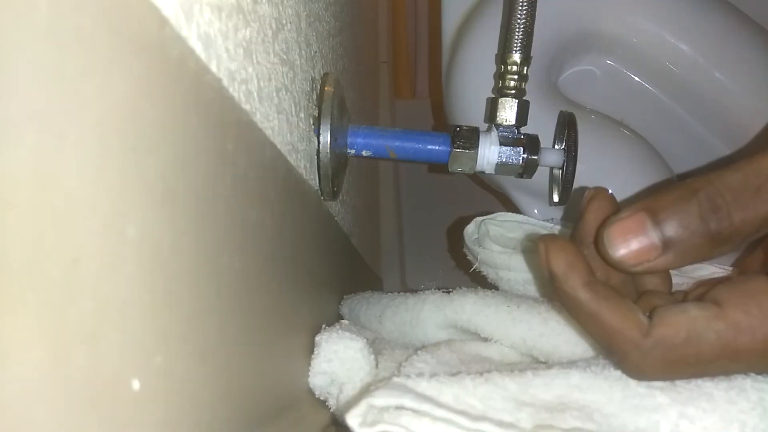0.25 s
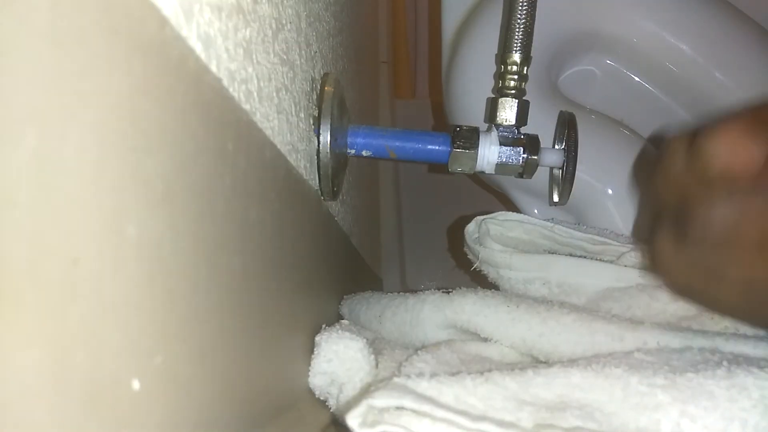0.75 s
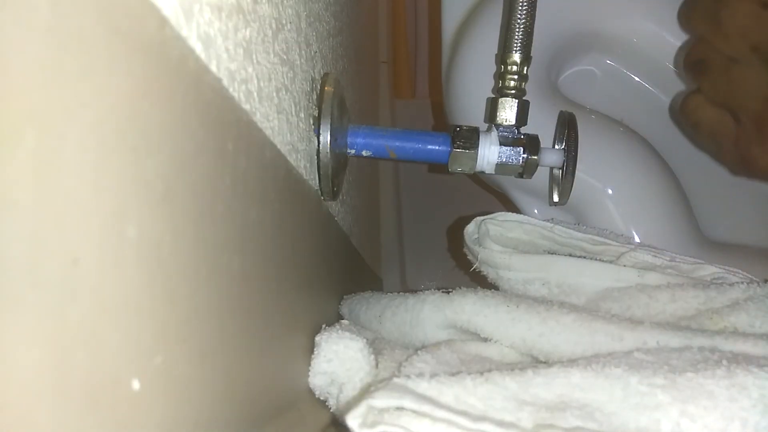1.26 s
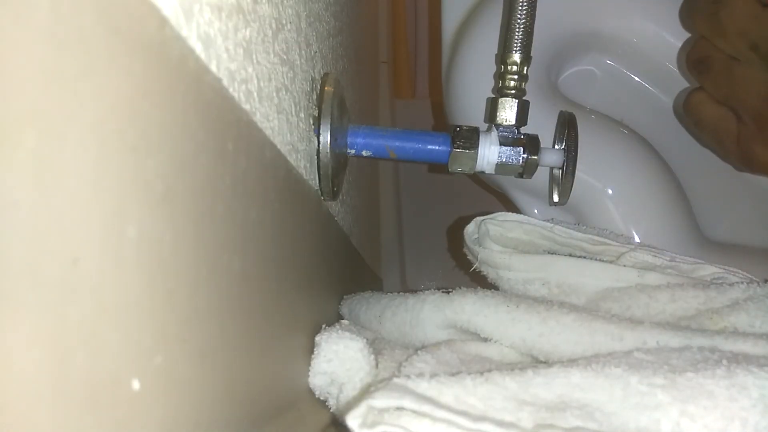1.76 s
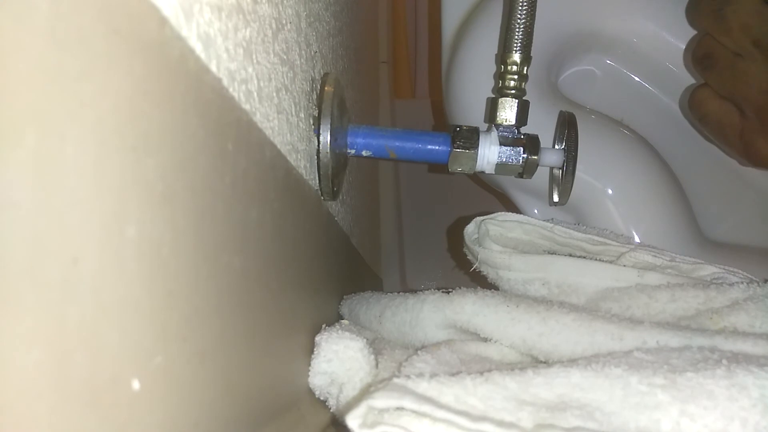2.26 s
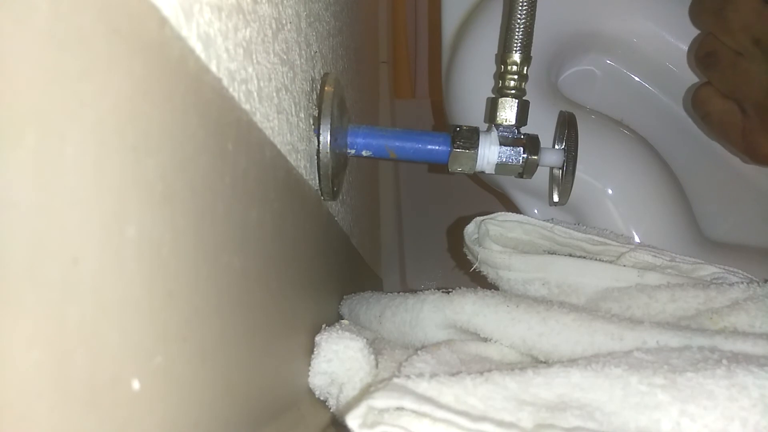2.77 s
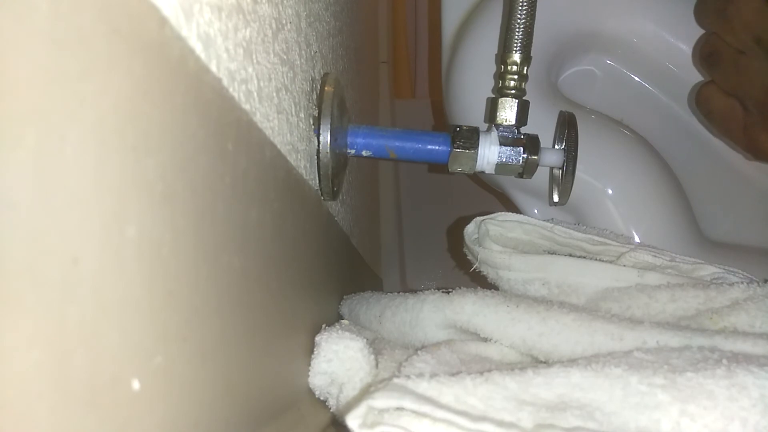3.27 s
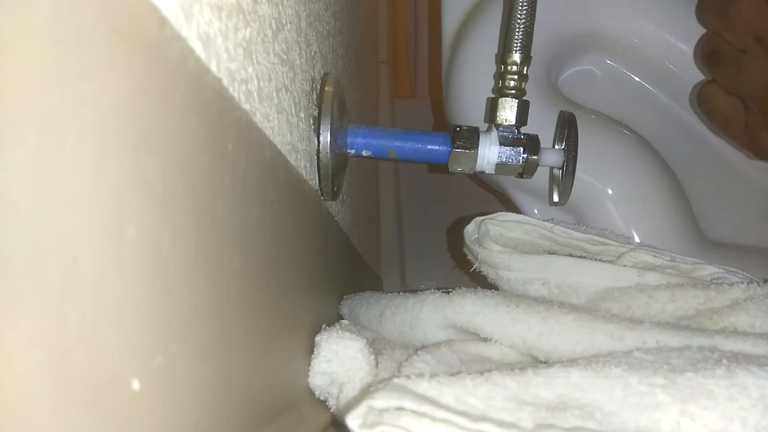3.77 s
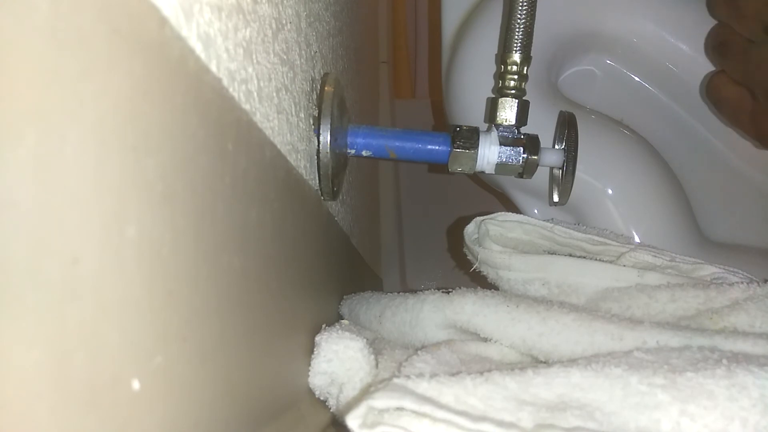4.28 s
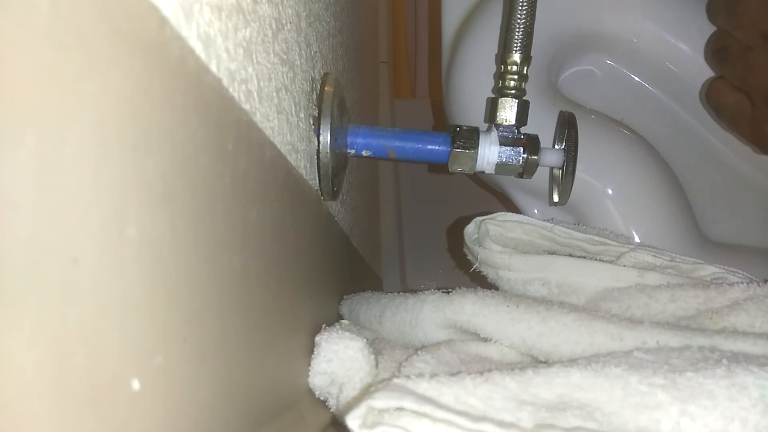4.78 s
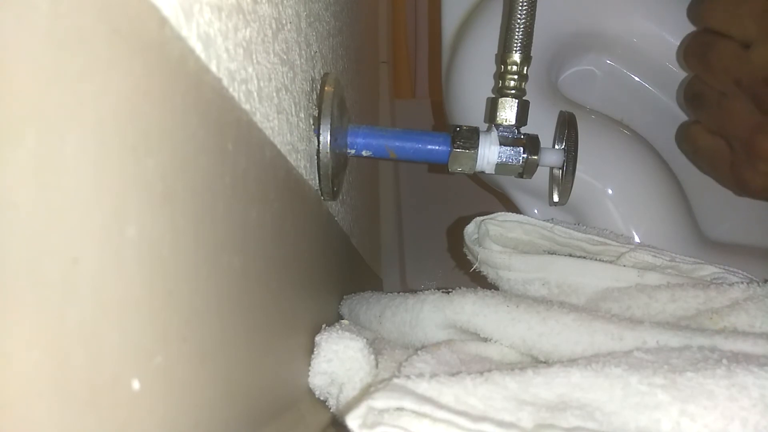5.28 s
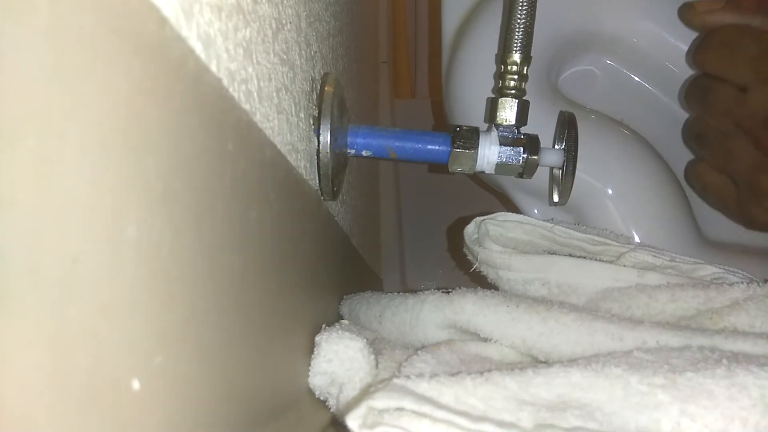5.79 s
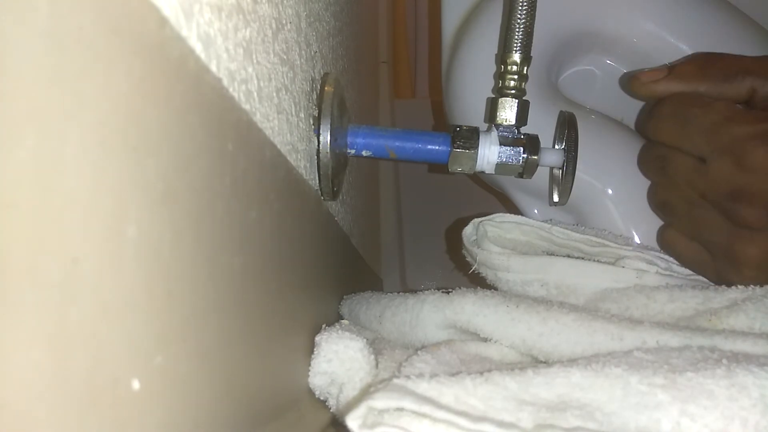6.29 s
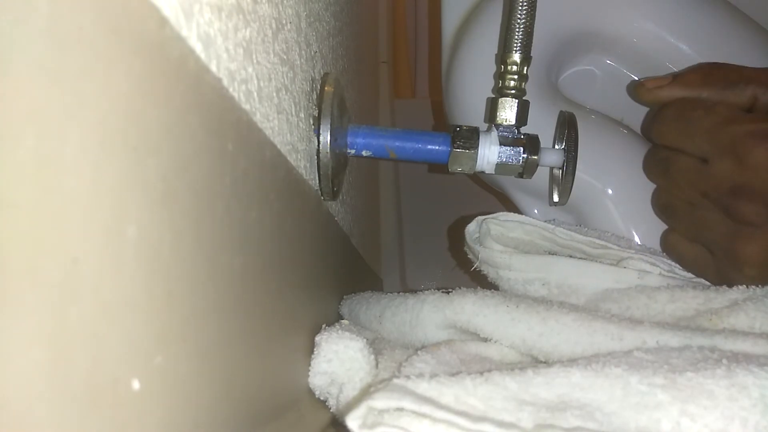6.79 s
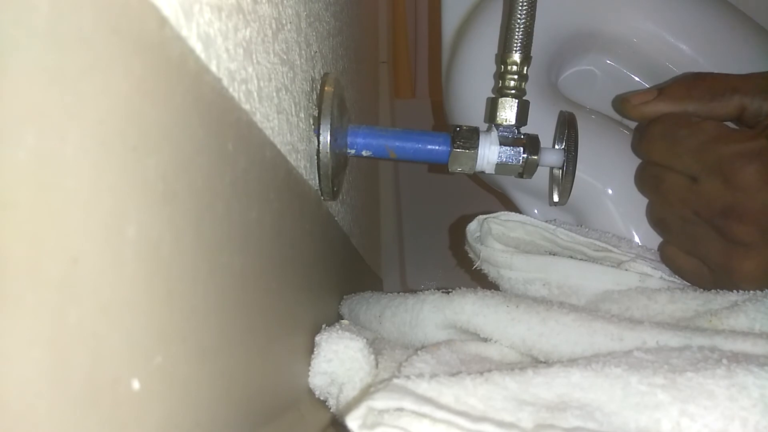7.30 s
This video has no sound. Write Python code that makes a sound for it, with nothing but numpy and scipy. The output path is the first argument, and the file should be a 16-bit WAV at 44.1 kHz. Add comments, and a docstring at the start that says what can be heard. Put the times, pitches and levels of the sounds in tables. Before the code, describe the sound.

A close stereo sound in a small hard bathroom. For a few hundredths of a second there is only soft low plumbing rumble, with a tick and low bump on the left. At about 0.07 s water bursts on abruptly, loudest until 0.3 s, with a tubular ring from the fill pipe. A strong, very high sputtering hiss with faint whistling stays close on the left, above a metallic pipe ring; the right is darker. Water splashes and fizzes in the tank. Hollow gulps come around 0.3 and 1 s, with a prominent cluster and dull plunge at 1.9-2.2 s, then more at 2.6 s. The hiss dips and spurts at 3.2, 4.6 and 5.1 s. Another gulp falls at 5.4 s, and heavier thuds at 6.6 s, bubbling around 7 s. The hiss has weakened, but water still runs at the end, about 7.5 s.

```python
"""A small bathroom: a toilet tank refills, heard from beside the shut-off valve, after a tick and a low bump.
Cavitation in the valve seat gives a sputtering hiss, close to the left microphone; resonance rings the supply pipe.
In the tank the stream splashes as a crowd of ringing bubbles, gulps as big bubbles, and plunges with dull thuds.
The air under the lid resonates as a soft boom, over the shaped-noise rumble of the plumbing.
"""
import sys
import numpy as np
from scipy import signal
from scipy.fft import rfft, irfft, next_fast_len
from scipy.io import wavfile
from scipy.ndimage import uniform_filter1d, map_coordinates

SR = 44100
rng = np.random.default_rng(int(sys.argv[2]) if len(sys.argv) > 2 else 0)


def store_wav(level_fs):
    """Save 16-bit WAV to argv[1]."""
    pcm = np.round(np.clip(np.atleast_2d(level_fs), -1, 1) * 32767)
    wavfile.write(sys.argv[1], SR, pcm.T.astype(np.int16))


N = 332592

# Mode widths are half-widths at -6 dB; spectra and modes give relative levels, later scaled to rms 1.
# Plumbing rumble spectrum: frequency_hz, density_db (per Hz)
RUMBLE_SPECTRUM = [(20, -26), (40, -6), (60, 0), (100, -1.5), (170, -3), (300, -14.5), (1000, -35.5)]
# Steady low layers: time_s, boom_db (before a 1 dB cut), rumble_db
LOW_LEVELS = [(0, -46, -44), (.7, -48, -50.5), (1.05, -48, -45.5), (1.3, -52, -54), (1.55, -49, -47),
              (1.75, -46, -51.5), (2.7, -45.5, -48.5), (3.1, -42, -57), (3.9, -47, -55.5), (4.4, -43, -48),
              (5.3, -42, -51.5), (6.1, -43.5, -54), (6.7, -42.5, -46), (7.54, -42.5, -55.5)]
STILL_DB = -4  # change of the rumble before the water runs
# Modes of the booming air space: centre_hz, width_hz, level_db
BOOM_MODES = [(202, 12, 0), (226, 10, -16), (175, 12, -17)]
# Modes of the glugging air space: centre_hz, width_hz, level_db
GLUG_MODES = [(314, 18, -6), (362.6, 10, 6), (404.7, 27.5, 1)]
GLUG_START_DB, GLUG_GROWTH_DB_PER_S = -56.5, 1.2  # steady churning, stronger as the tank fills
# Heaving of the water in the tank: crest_s, glug_db, boom_db
SLOSHES = [(.11, -46, -30.5), (.22, -49, -36.5), (.46, -48, -37.5), (.58, -44, -39), (.71, -48, -54),
           (1.0, -44, -33), (1.14, -46, -44), (1.44, -46, -34), (1.98, -40.5, -37), (2.36, -69, -37.5),
           (2.96, -66, -42), (3.22, -50, -40), (4.02, -53, -39), (4.77, -41, -38), (5.04, -53, -34.5),
           (5.55, -40.5, -41), (6.67, -45, -37.5), (6.79, -55, -39.5), (7.33, -66, -32)]
SLOSH_RISE_S, SLOSH_FALL_S = 0.048, 0.074  # Gaussian scales before and after the crest
SLOSH_SPLASH_DB, SLOSH_RUMBLE_DB = -13, -17  # against the slosh's glug
# Air dragged under by the stream: start_s, pitch_hz, level_db
PLUNGES = [(0.965, 310, -34), (1.048, 309, -32), (1.145, 336, -38), (1.443, 410, -36), (1.916, 358, -30.5),
           (3.284, 392, -32), (4.734, 361, -32.5), (6.125, 365, -34.5), (6.602, 356, -28),
           (6.674, 363, -31.5), (7.443, 410, -36)]
# Water closing over a plunge: frequency_hz, density_db (per Hz)
THUD_SPECTRUM = [(30, -15), (70, -7), (250, 0), (600, -6), (1500, -34), (4000, -70)]
# Big bubbles: start_s, pitch_hz, level_db (before a 1.5 dB lift of the bubble itself)
GULPS = [(0.282, 820, -22), (0.352, 813, -31), (0.51, 794, -30.5), (0.975, 580, -30), (0.99, 900, -26.5),
         (1.017, 800, -31), (1.57, 865, -34), (1.575, 1335, -28), (1.946, 883, -14.5), (1.955, 690, -26),
         (1.984, 888, -21), (1.99, 1170, -31), (2.055, 910, -30), (2.105, 612, -24), (2.139, 1310, -33),
         (2.233, 519, -32.5), (2.528, 597, -33), (2.62, 784, -26), (2.625, 680, -32), (2.635, 890, -33),
         (2.649, 752, -36), (2.65, 1330, -32), (2.902, 1205, -32.5), (4.169, 870, -29.5),
         (4.274, 870, -32.5), (4.37, 874, -34.5), (4.56, 648, -36), (4.59, 874, -35.5), (5.04, 564, -35.5),
         (5.384, 903, -24), (6.6, 605, -33), (6.61, 896, -40), (6.66, 770, -42), (6.882, 936, -34),
         (6.908, 886, -32.5), (6.94, 1170, -41), (6.97, 950, -43), (7.058, 770, -25.5), (7.07, 897, -30.5),
         (7.105, 760, -29.5), (7.145, 698, -35), (7.2, 780, -39), (7.29, 544, -40), (7.31, 1180, -44),
         (7.325, 646, -41), (7.362, 880, -29.5)]
# Modes of the basin, rung by the splash: centre_hz, width_hz, level_db
BASIN_MODES = [(520, 25, -7), (625, 40, -2), (705, 18, -1), (775, 16, -2), (815, 14, -1), (868, 16, 2),
               (896, 14, 7), (1020, 50, -7), (1170, 30, -2), (1300, 35, -5), (1445, 18, 0)]
BASIN_RING_DB, BASIN_T60_S = -16, 0.31  # ring of the basin under a gulp, against level_db; its decay
# Splash spectrum: frequency_hz, density_db (per Hz)
SPLASH_SPECTRUM = [(160, -18.5), (280, -6.5), (356, -8), (448, -15), (570, -9.5), (860, -7.5), (980, -7),
                   (1410, 2), (1610, -0.5), (1790, -3), (2340, -2), (2910, -3.5), (4800, 0.5), (5400, 5),
                   (6500, -29), (11000, -120)]
# Modes of the fill tube: centre_hz, width_hz, level_db
TUBE_MODES = [(1770.4, 15.7, 22), (1856, 36, 15), (1936, 20, 15.5), (2020, 20, 5.5), (1770, 134, 7)]
# Level of the fill tube's ring: time_s, level_db
TUBE_LEVEL = [(.08, -27), (.24, -27.5), (.39, -41.5), (.48, -31.5), (.6, -34.5), (.72, -40.5), (.8, -35),
              (.94, -52), (.99, -35), (1.26, -45), (2.0, -41), (2.3, -45.5), (3.65, -46), (4.15, -50.5),
              (4.45, -44), (4.83, -48.5), (5.0, -54), (5.11, -44.5), (5.45, -57), (6.55, -49.5),
              (6.69, -47.5), (6.85, -51.5), (7.1, -51.5), (7.54, -57.5)]
GURGLE_LOWEST_HZ, GURGLE_OCTAVES, GURGLE_DB = 519.5, 1.5, -8.5  # small bubbles: pitch range, mix level
DULL_HZ, DULL_DB_PER_S = 940, 0.02  # the splash slowly loses its treble as the water deepens
# Jet strength in the valve, before spurts: time_s, flow_db (against full flow)
FLOW = [(.1, -3), (.25, -2.2), (.33, -4.5), (.45, -2), (.68, -4), (.78, -0.2), (.94, -4), (1.02, -1),
        (1.2, 0), (1.47, -5), (1.62, 0.5), (1.87, -4.5), (1.97, -3.5), (2.2, -2.5), (2.33, -0.9),
        (2.5, -4.5), (2.67, -4), (2.82, -2), (3.04, -2.5), (3.17, -8.5), (3.72, -5), (3.96, -1.3),
        (4.15, -3.5), (4.4, -8.5), (4.78, -6), (4.95, -14), (4.99, -7), (5.055, -13), (5.07, -5),
        (5.25, -7.5), (5.4, -12), (5.55, -9.5), (6.0, -11), (6.28, -9), (6.42, -14), (6.53, -10),
        (6.68, -8.5), (6.85, -13), (6.95, -11.5), (7.5, -14)]
# Spurts of the jet: start_s, rise_s, fall_s, gain_db
SPURTS = [(3.18, 0.05, 0.089, 8), (3.3, 0.071, 0.25, 6), (4.51, 0.066, 0.14, 7.5), (4.73, 0.069, 0.13, 4.5),
          (5.058, 0.083, 0.091, 11.5), (6.09, 0.068, 0.07, 5.5)]
# Water levels apart from the jet's swings: time_s, pipe_db, splash_db
BODY = [(.3, -31, -42.5), (1.3, -34, -41), (2.1, -32, -42.5), (3.5, -33, -44.5), (4.7, -35, -43.5),
        (5.3, -38, -47.5), (6.2, -37.5, -47.5), (7.54, -39.5, -45.5)]
PIPE_FOLLOWS, SPLASH_FOLLOWS = 0.56, 0.15  # dB for each dB of flow
RUSH_END_S, RUSH_RELEASE_S = 0.25, 0.059  # the first rush through the empty pipe, and its 1/e ebb
RUSH_PIPE_DB, RUSH_SPLASH_DB = 5, 8  # what the rush adds
# Air pockets rattling through the pipe: middle_s, pipe_db
POCKETS = [(1.0, -32), (1.99, -32.5)]
POCKET_S, POCKET_SPLASH_DB = 0.062, -11  # Gaussian scale; splash against pipe ring
# Cavitation hiss spectrum: frequency_hz, density_db (per Hz)
HISS_SPECTRUM = [(3820, -83), (6400, -21.5), (6990, -13.5), (7500, -14), (8370, -15), (11200, 0.5),
                 (12500, -0.5), (13700, -12), (15000, -12.5), (15600, -16.5)]
HISS_DB = -18  # at full flow
# Whistles of the valve seat: centre_hz, width_hz, level_db
WHISTLE_MODES = [(10277, 9, 0), (10752, 11, 1), (10987, 14, -2), (11222, 40, -6), (11454, 14, 0),
                 (12248, 18, -3), (12919, 40, -6), (13732, 18, -14), (13943, 16, -14), (14690, 14, -10),
                 (15251, 16, -13)]
# Settling of the jet: time_s, sizzle_db (finest fizz), spill_db (to the right microphone)
AIM = [(.08, 10.5, 1), (.7, 6.5, 2.5), (1.3, 6, -0.5), (2.1, 4, 0.5), (2.9, 4, -1.5), (3.3, 5.5, -4),
       (4.1, 5.5, -4), (4.6, 6, -1), (5.5, 4, -4.5), (6.2, 3.5, -7), (6.5, 7, -1), (7.54, 5.5, -3.5)]
# Modes of the supply pipe and valve body: centre_hz, width_hz, level_db
PIPE_MODES = [(2490, 50, -23), (2945, 30, -13.5), (3380, 60, -18), (3640, 50, -14), (3780, 55, -13),
              (3930, 35, -15), (4210, 75, -15), (4600, 50, -12), (4780, 30, -16), (5120, 45, -8),
              (5305, 45, 1), (5450, 70, -1), (5680, 110, -3.5), (6030, 120, -4.5), (6480, 110, -10),
              (6720, 110, -11), (7330, 70, -3), (7487, 20, 3), (7666, 19, 3), (7790, 60, -4)]
# Acoustic shadow on the right microphone: frequency_hz, gain_db (against the left)
SHADOW = [(100, -1), (350, -5), (1050, 1.5), (1800, -4.5), (3000, -0.5), (5500, -12.5), (7700, -10.5),
          (8400, -12), (9200, -2.5), (10500, -20), (11300, -21.5), (12100, -37), (13000, -39),
          (15300, -7.5)]
# Likeness of the two microphones: frequency_hz, correlation (from -1 to 1)
CORRELATION = [(60, -0.88), (200, -0.91), (400, -0.8), (700, -0.42), (1800, -0.36), (3000, -0.12)]
BUMP_S, OPEN_S = 0.044, 0.069  # start of the bump, start of the water
TOP_HZ = 15750  # band limit


def amp(db):
    """Level law: decibels to amplitude gain."""
    return 10 ** (np.asarray(db) / 20)


def unit(x):
    """Normalisation to rms 1."""
    return x / np.sqrt(np.mean(x ** 2) + 1e-20)


def seconds():
    """Sampling: the time of every sample."""
    return np.arange(N) / SR


def along(points, hz):
    """Linear interpolation of (Hz, value) points on a log-frequency axis."""
    f, v = np.transpose(points)
    return np.interp(np.log(hz + 1), np.log(f + 1), v)


def curves(rows):
    """Linear interpolation in time: one curve for each column after the time."""
    s, *columns = np.transpose(rows)
    return [np.interp(seconds(), s, column) for column in columns]


def wobble(rate):
    """Slow random modulation: a smooth curve through rate random knots a second."""
    knots = rng.standard_normal(int(N * rate / SR) + 4)
    return map_coordinates(knots, [np.arange(N) * rate / SR])


def noise():
    """White noise: two unrelated channels."""
    return rng.standard_normal((2, N))


def filtered(x, response):
    """Linear filtering: the spectrum times a response of frequency."""
    size = next_fast_len(N + SR // 2)
    return irfft(rfft(x, size) * response(np.fft.rfftfreq(size, 1 / SR)), size)[..., :N]


def coloured(x, spectrum):
    """Spectral shaping by (Hz, dB) points, at rms 1."""
    return unit(filtered(x, lambda hz: amp(along(spectrum, hz))))


def resonant(x, modes):
    """Modal resonance: the powers of steep-skirted modes add, at rms 1."""
    def response(hz):
        power = 0
        for centre, width, db in modes:
            power = power + amp(db) ** 2 / (1 + ((hz - centre) / width) ** 2) ** 2
        return np.sqrt(power)
    return unit(filtered(x, response))


def steadied(x, share):
    """Envelope compression: a share of a narrow ring's random fading is evened out."""
    envelope = abs(signal.hilbert(x, next_fast_len(N))[..., :N])
    return unit(x / (envelope + 0.11) ** np.clip(share, 0, 1))


def restless(x, patchy_db, size, count):
    """Turbulent intermittency: random gain patches, size bins wide and count frames long."""
    z = signal.stft(x, nperseg=1024)[2]
    field = uniform_filter1d(rng.standard_normal(z.shape[1:]), size, 0)
    field = uniform_filter1d(field, count, 1)
    return unit(signal.istft(z * amp(patchy_db * unit(field)), nperseg=1024)[1][:, :N])


def decays(starts, db, t60):
    """Exponential decay: a gain that jumps at each start and loses 60 dB in t60 seconds."""
    kicks = np.bincount((starts * SR).astype(int), amp(db), N)[:N]
    return signal.lfilter([1], [1, -amp(-60 / (t60 * SR))], kicks)


def echoes(x, t60, wet_db):
    """Reverberation at two places: the direct sound and a dense dying tail."""
    t = np.arange(int(SR * t60) + 2) / SR
    tail = rng.standard_normal((2, len(t))) * amp(-60 * t / t60)
    tail *= amp(wet_db) / np.linalg.norm(tail, axis=1, keepdims=True)
    tail[:, 0] += 1
    return signal.fftconvolve(np.atleast_2d(x), tail, axes=1)[:, :N] / np.hypot(1, amp(wet_db))


def alcove(pair, t60, wet_db):
    """Comb filtering: quick echoes between wall and porcelain carve narrow bands, at rms 1."""
    return unit(echoes(pair, t60, wet_db))


def bubbles(starts, hz, gains, cycles, rise, size=3675):
    """Bubble resonance: damped sines with a soft start, climbing in pitch as the bubble nears the surface."""
    t = np.arange(size) / SR
    age = hz[:, None] * t / cycles  # in 1/e decay times
    climb = 1 + rise * np.minimum(age, 2) / 2
    envelope = np.exp(-age) * (1 - np.exp(-5 * age))
    ring = np.sin(2 * np.pi * cycles * age * climb) * envelope
    where = (starts * SR).astype(int)[:, None] + np.arange(size)
    return np.bincount(where.ravel(), (gains[:, None] * ring).ravel(), N)[:N]


def shaded(x):
    """Acoustic shadow: what reaches the right microphone."""
    return filtered(x, lambda hz: amp(along(SHADOW, hz)))


def microphones(pair):
    """Interchannel correlation: opposed in the bass, nearly unrelated in the treble, the right shaded."""
    def mid_side_gains(hz):
        turn = np.arccos(np.clip(along(CORRELATION, hz), -1, 1)) / 2
        return np.array([np.sin(turn), np.cos(turn)])
    side, mid = filtered(pair, mid_side_gains)
    return np.array([mid + side, shaded(mid - side)])


def flow():
    """Varying jet strength in dB: a wandering fall with triangular spurts."""
    flow_db = curves(FLOW)[0]
    for start, rise, fall, db in SPURTS:
        flow_db = flow_db + np.interp(seconds(), [start, start + rise, start + rise + fall], [0, db, 0])
    return flow_db


def first_rush():
    """Transient flow: 1 while water shoots through the empty pipe, then an exponential ebb."""
    return np.exp(-np.maximum(seconds() - RUSH_END_S, 0) / RUSH_RELEASE_S)


def sloshing():
    """Surface heaving as gains of glug and boom: each slosh swells quickly and sinks more slowly."""
    t = seconds()
    gains = 0
    for crest, glug_db, boom_db in SLOSHES:
        scale = np.where(t < crest, SLOSH_RISE_S, SLOSH_FALL_S)
        gains = gains + amp([[glug_db], [boom_db]]) * np.exp(-((t - crest) / scale) ** 2)
    return gains


def pockets():
    """Two-phase flow: the gain of air pockets passing through the pipe."""
    return sum(amp(db) * np.exp(-((seconds() - s) / POCKET_S) ** 2) for s, db in POCKETS)


def rumble(opened):
    """Broadband low noise of the plumbing: softer before the water runs, swelling with each slosh."""
    steady = amp(curves(LOW_LEVELS)[1] + 4.1 * wobble(16))
    gain = np.hypot(steady, amp(SLOSH_RUMBLE_DB) * sloshing()[0])
    return amp(STILL_DB * (1 - opened)) * gain * microphones(coloured(noise(), RUMBLE_SPECTRUM))


def bump(hz=75, swing_db=-31, swing_t60=0.3, tick_db=-28, tick_t60=0.042):
    """Damped impulse response: a tick and a short low swing, mostly on the left, just before the water."""
    t = np.maximum(seconds() - BUMP_S, 0)
    swing = -np.sin(2 * np.pi * hz * t) * amp(swing_db - 60 * t / swing_t60)
    tick = coloured(noise()[0], [(500, 4.0), (1500, -2), (5000, -19.0), (14000, 0)])
    tick = tick * (t > 0) * amp(tick_db - 60 * t / tick_t60)
    return (swing + tick) * amp([[0], [-20]])


def tank():
    """Cavity resonance: the air under the lid booms and glugs, stronger during each slosh."""
    slosh_glug, slosh_boom = sloshing()
    boom_db = curves(LOW_LEVELS)[0] - 1 + 3.3 * wobble(14)
    glug_db = GLUG_START_DB + GLUG_GROWTH_DB_PER_S * seconds() + 1.6 * wobble(13)
    boom = steadied(resonant(noise(), BOOM_MODES), share=0.17) * np.hypot(amp(boom_db), slosh_boom)
    glug = steadied(resonant(noise(), GLUG_MODES), share=.3) * np.hypot(amp(glug_db), slosh_glug)
    return boom + glug


def plunges(cycles=8, rise=0.0091, thud_db=-7, thud_t60=0.18):
    """Air entrainment: each plunge gives a sharp-edged dull thud and a deep glug of trapped air."""
    starts, hz, db = np.transpose(PLUNGES)
    glugs = bubbles(starts, hz, amp(db), cycles, rise, size=6000)
    thuds = decays(starts, db + thud_db, thud_t60) * coloured(noise(), THUD_SPECTRUM)
    return glugs + thuds


def gulps(count=8):
    """Bubble fragmentation: each big bubble rings the basin and trails smaller ones near its own pitch."""
    starts, hz, db = np.transpose(GULPS)
    big = bubbles(starts, hz, amp(db + 1.5), cycles=9.7, rise=0.021)
    delay, detune, size = rng.random((3, len(starts), count))
    trail_s = starts[:, None] + .11 * delay ** 2
    trail_hz = hz[:, None] * 1.4 ** (2 * detune - 1)
    trail_db = db[:, None] - 12 - 7 * delay - 6 * size
    small = bubbles(trail_s.ravel(), trail_hz.ravel(), amp(trail_db).ravel(), cycles=5.8, rise=0.063)
    basin = decays(starts, db + BASIN_RING_DB, BASIN_T60_S) * resonant(noise(), BASIN_MODES)
    return echoes(big + small, t60=.22, wet_db=-4) + basin


def gurgles(cycles=13, rise=.05, spread_db=12, count=420):
    """Bubble resonance with reverberation: small bubbles at random times ring on in the tank, at rms 1."""
    when, pitch, strength = rng.random((3, count))
    hz = GURGLE_LOWEST_HZ * 2 ** (GURGLE_OCTAVES * pitch)
    blips = bubbles(when * N / SR, hz, amp(spread_db * strength ** 2), cycles, rise)
    return unit(echoes(blips, t60=.16, wet_db=4.0))


def fizz(count=4500):
    """Random superposition: a crowd of short-lived bubbles in each channel, at rms 1."""
    channels = []
    for _ in range(2):
        when, pitch, strength = rng.random((3, count))
        gains = amp(13 * strength ** 4)
        channels.append(bubbles(when * N / SR, 420 * 9 ** pitch, gains, cycles=3.5, rise=.08, size=1100))
    return unit(np.array(channels))


def stream():
    """Forced resonance: bubbles churning in a wash of noise ring the basin; noise rings the fill tube."""
    churn = amp(-6.0) * fizz() + coloured(noise(), [(300, 10.5), (5000, -7.0), (9000, -47)])
    wash = restless(coloured(churn, SPLASH_SPECTRUM), patchy_db=3.5, size=4, count=8)
    wash = alcove(wash, t60=.07, wet_db=-4.5)
    splash = amp(-1.0) * wash + amp(-7) * resonant(churn, BASIN_MODES) + amp(GURGLE_DB) * gurgles()
    treble = filtered(splash, lambda hz: 1 - 1 / (1 + (hz / DULL_HZ) ** 4))
    splash = splash + (amp(-DULL_DB_PER_S * seconds()) - 1) * treble
    splash_db = curves(BODY)[1] + SPLASH_FOLLOWS * flow() + RUSH_SPLASH_DB * first_rush()
    splash_db = splash_db + 1.0 * wobble(12) + 0.59 * wobble(60)
    stirred = amp(SLOSH_SPLASH_DB) * sloshing()[0] + amp(POCKET_SPLASH_DB) * pockets()
    tube = restless(resonant(noise(), TUBE_MODES), patchy_db=3.5, size=2, count=12)
    tube = amp(curves(TUBE_LEVEL)[0] + 1.2 * wobble(16)) * tube
    return np.hypot(amp(splash_db), stirred) * splash + tube


def cavitation(rate, spread_db, smooth_db):
    """Cavitation: vapour pockets collapse as clicks of uneven size, rate a second, over the jet's smooth rush."""
    struck = rng.random((2, N)) < rate / SR
    clicks = struck * np.sign(noise()) * amp(spread_db * rng.uniform(-0.83, 1, (2, N)))
    return unit(unit(clicks) + amp(smooth_db) * noise())


def valve_hiss(sputter, sizzle_db):
    """Cavitation noise: the sputtering jet whistles faintly in its seat, its finest fizz coming and going."""
    jet = coloured(cavitation(rate=4900, spread_db=2.0, smooth_db=12.0) * sputter, HISS_SPECTRUM)
    jet = restless(jet, patchy_db=1.6, size=5, count=15)
    hiss = alcove(jet, t60=.06, wet_db=-7) + amp(-9.5) * resonant(noise(), WHISTLE_MODES)
    sizzle = filtered(hiss, lambda hz: np.clip((hz - 12600) / 900, 0, 1))  # the smallest pockets
    hiss = hiss + (amp(sizzle_db + 0.78 * wobble(7)) - 1) * sizzle
    return amp(HISS_DB + flow() + 0.61 * wobble(17)) * hiss


def pipe_ring(sputter):
    """Structural resonance: sputtering noise excites the modes of the supply pipe and valve body."""
    ring = restless(resonant(noise() * sputter, PIPE_MODES), patchy_db=4.5, size=4, count=10)
    ring = alcove(ring, t60=.09, wet_db=-9.5)
    pipe_db = curves(BODY)[0] + PIPE_FOLLOWS * flow() + RUSH_PIPE_DB * first_rush()
    return np.hypot(amp(pipe_db + 0.33 * wobble(8.2)), pockets()) * ring


def valve():
    """Near-field source: hiss and pipe ring share one sputter, direct on the left, shaded on the right."""
    sizzle_db, spill_db = curves(AIM)
    sputter = amp(0.69 * wobble(28) + 0.39 * wobble(170))
    hiss = valve_hiss(sputter, sizzle_db)
    pipe = pipe_ring(sputter)
    right = amp(spill_db + 2.1 * wobble(10.0)) * hiss[1] + pipe[1]
    return np.array([hiss[0] + pipe[0], shaded(right)])


def scene():
    """Superposition: rumble throughout, a bump, then the water layers fading in within 1.4 ms."""
    opened = np.clip((seconds() - OPEN_S) / 0.0014, 0, 1)
    in_tank = microphones(tank() + plunges() + gulps() + stream())
    return rumble(opened) + bump() + opened * (in_tank + valve())


def record(dry):
    """Band limiting: nothing is kept from TOP_HZ upward."""
    return filtered(dry, lambda hz: hz < TOP_HZ)


dry = scene()
out = record(dry)
store_wav(out)
```